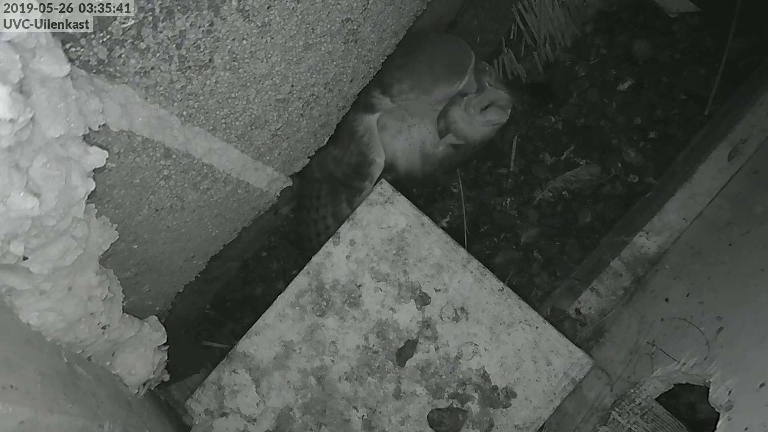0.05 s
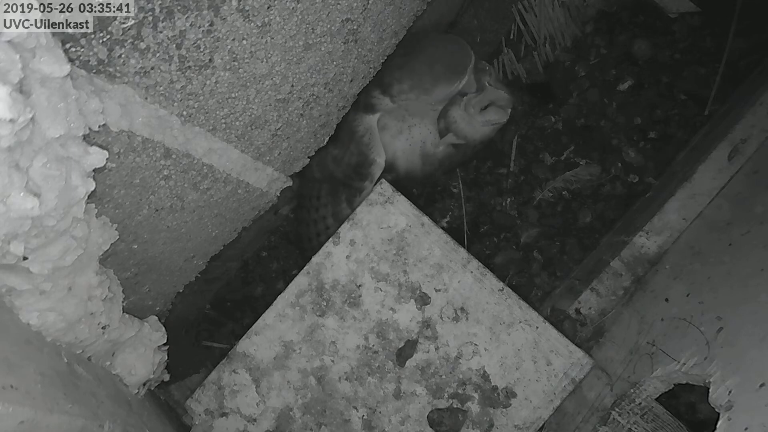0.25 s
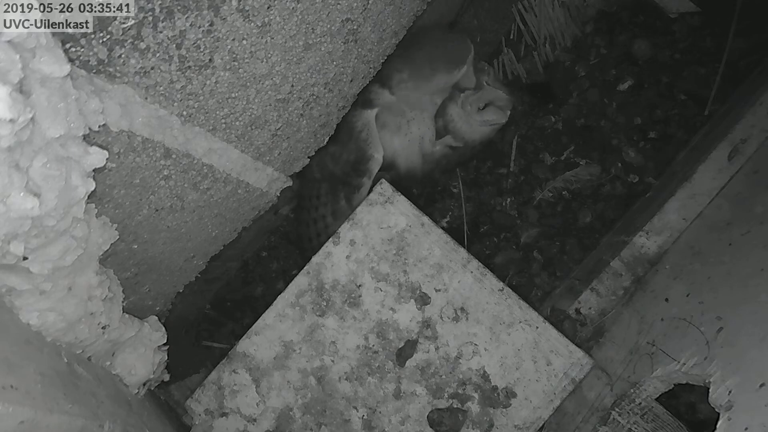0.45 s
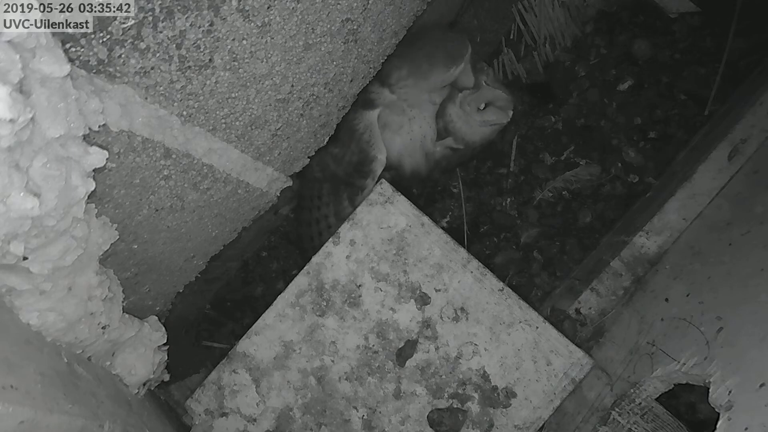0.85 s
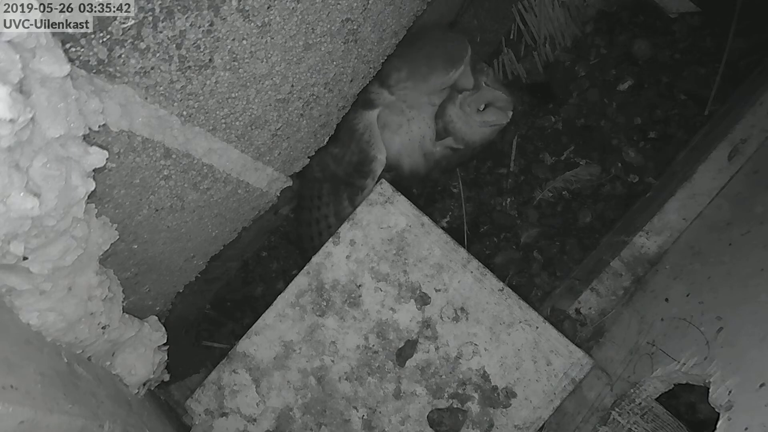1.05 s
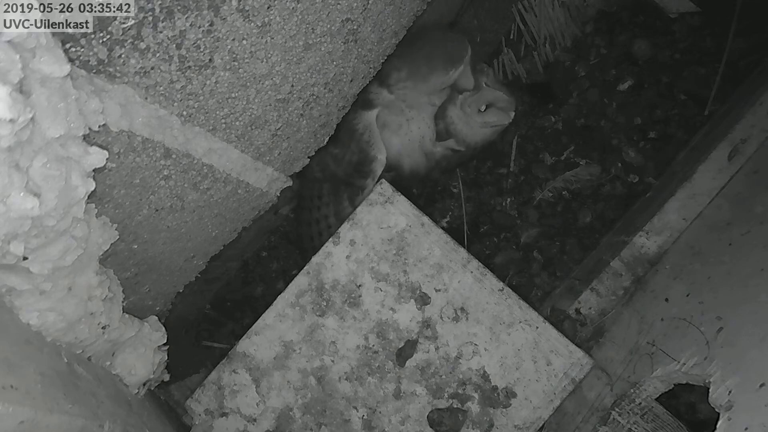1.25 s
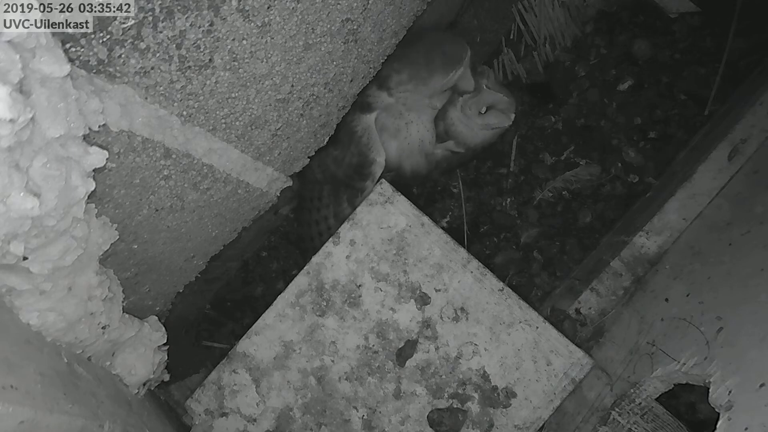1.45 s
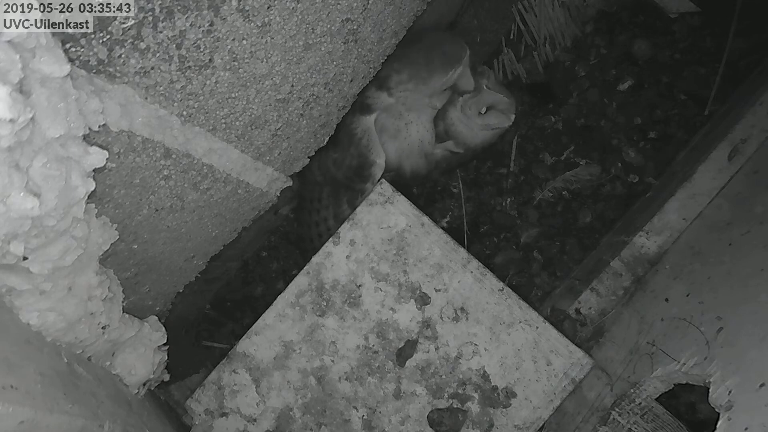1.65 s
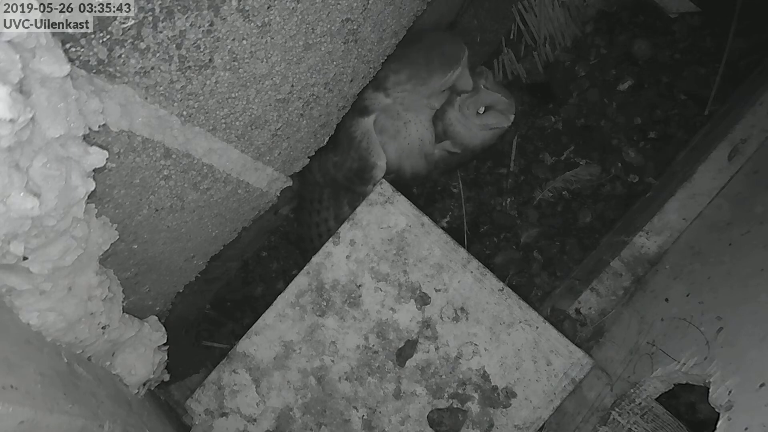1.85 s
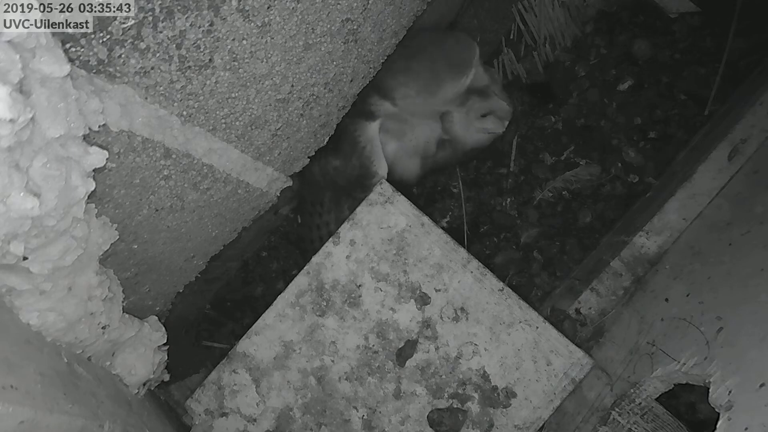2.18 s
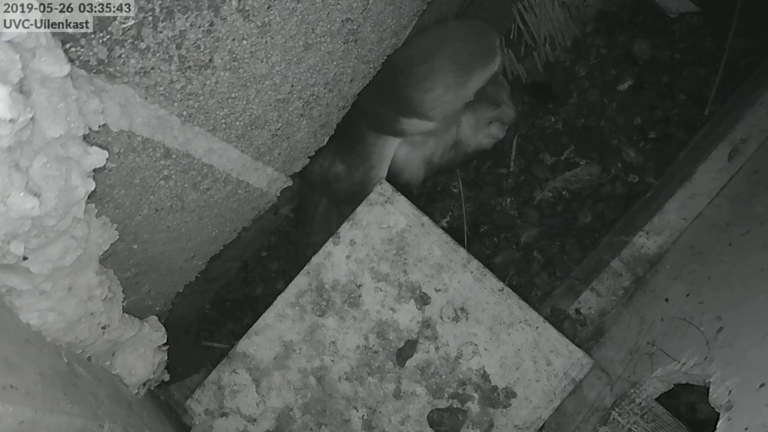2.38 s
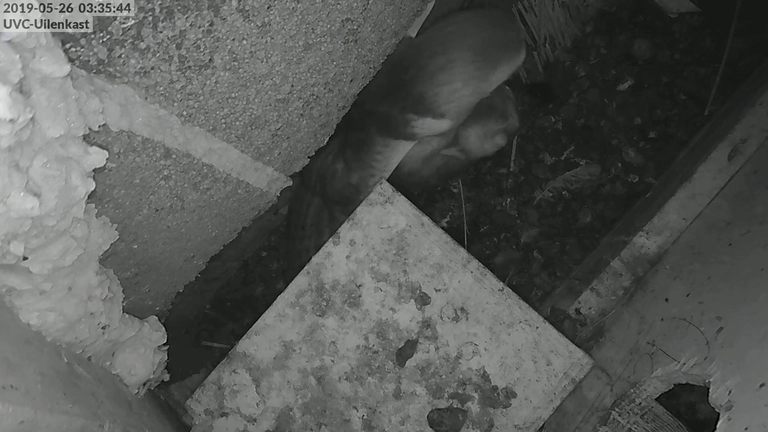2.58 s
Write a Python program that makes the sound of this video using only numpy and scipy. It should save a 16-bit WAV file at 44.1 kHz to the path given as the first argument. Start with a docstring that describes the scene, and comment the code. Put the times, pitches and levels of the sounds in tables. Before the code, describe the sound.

Harsh hisses from barn owls come four times in a row, growing louder, heard up close inside a nest box. Between them come thin whistles, soft clucks and a fast twitter, with two very faint foot bumps.

```python
"""Barn owls beg in a nest box with four long rasping hisses, close to a small microphone.
Each hiss follows the source-filter principle: air noise swells, flutters and is coloured by the
resonances of throat and box. Thin wavering whistles and a fast twitter, both harmonic tones mixed
with air, sound between the hisses, and soft clucks follow the second and the last.
Feet bump the floor twice, and the walls add a short reverberation."""
import sys
import numpy as np
from scipy import signal
from scipy.fft import rfft, irfft, next_fast_len
from scipy.io import wavfile
from scipy.ndimage import map_coordinates

SR = 44100
rng = np.random.default_rng(int(sys.argv[2]) if len(sys.argv) > 2 else 0)


def output_pcm(signal):
    """Save a mono or channel-first signal as 16-bit PCM at the path in sys.argv[1].

    Samples are clipped to [-1, 1] before scaling.
    """
    pcm = np.clip(np.atleast_2d(signal).T, -1, 1) * 32767
    wavfile.write(sys.argv[1], SR, np.round(pcm).astype(np.int16))


N = 121275
T = np.arange(N) / SR

# Spectra of the background and the floor board. Each row: frequency in Hz, gain in dB.
BACKGROUND_SPECTRUM = [(25, -2), (130, -27), (185, -4.5), (250, -11.5), (370, 2.5), (480, -10.5), (900, 2),
                       (2000, -14), (5000, -18), (9000, -11.5), (14000, -29)]
BOARD_SPECTRUM = [(40, -16), (140, -14), (195, 5), (260, -17), (380, -4), (700, -22), (3000, -60)]
# Footfalls. Each row: centre in seconds, half length in seconds, level in dB.
FOOT_BUMPS = [(1.376, .014, -68), (2.13, .025, -76)]

# Spectra of the air in the small calls. Each row: frequency in Hz, gain in dB.
CLUCK_BREATH = [(300, -31), (550, -12.5), (800, 1), (1300, -7), (1800, -10.5), (2300, -16), (2750, -5.5),
                (3200, -17), (3700, -16), (4500, -30), (6000, -22), (7800, -12.5), (9000, -25),
                (12000, -26), (15000, -42)]
TWITTER_BREATH = [(250, -35), (480, -19), (650, -2.5), (950, 2.5), (1250, -6), (1600, 5), (1950, -3.5),
                  (2350, -17), (2800, -10), (3200, -8), (3600, -42), (4200, -47), (5200, -26), (6500, -20),
                  (7900, -9.5), (9000, -31), (11300, -18), (12500, -38), (15000, -47)]
WHISTLE_BREATH = [(250, -41), (450, -16.5), (580, -1.5), (950, 2), (1380, -8), (1750, 0), (2050, 1),
                  (2400, -12.5), (2900, -11), (3400, 0.5), (3850, -38), (4300, -53), (5200, -28),
                  (6500, -12.5), (7900, -3), (9000, -17.5), (12500, -12.5), (15000, -52)]
# Partials of the voice. Each row: multiple of the pitch, relative level in dB.
HARMONICS = [(1, 0), (2, -13), (3, -33), (4, -28), (5, -26)]
# Partials of the low buzz. Each row: multiple of a third of the pitch, relative level in dB.
BUZZ_PARTIALS = [(1, -19), (2, -18), (4, -24), (5, -20), (6, -14)]
# Clucks. Each row: centre in seconds, half length in seconds, relative level in dB, pitch in Hz.
CLUCK_NOTES = [(1.045, 0.0053, -55, 1088), (1.071, 0.0042, -51, 1083), (1.088, .003, -57.5, 1232),
               (1.112, 0.0018, -56.5, 1413), (2.506, 0.0065, -54.5, 1080), (2.544, 0.0037, -59.5, 1050),
               (2.571, 0.007, -54.5, 1050), (2.598, 0.011, -49, 1310), (2.627, 0.0069, -52, 1310),
               (2.652, 0.0014, -66, 950), (2.66, 0.0061, -56.5, 1310), (2.681, 0.0065, -52.5, 1260),
               (2.707, 0.00086, -49.5, 900), (2.714, .0025, -55.5, 1150), (2.731, 0.0013, -61, 900),
               (2.743, 0.0032, -56, 1300)]
# Twitter. Each row: centre in seconds, relative level in dB.
TWITTER_NOTES = [(1.871, -46), (1.891, -45.5), (1.913, -46.5), (1.934, -44.5), (1.952, -46), (1.973, -46),
                 (1.994, -47.5), (2.013, -46)]
# One table per whistle. Each row: time in seconds, pitch in Hz, relative level in dB.
WHISTLE_CONTOURS = [
    [(.33, 1574, -54), (.352, 1572, -56), (.368, 1693, -44), (.41, 1746, -46), (.425, 1720, -55),
     (.44, 1715, -42.5), (.454, 1934, -55), (.468, 1770, -41), (.485, 1705, -46.5), (.495, 1865, -44.5),
     (.53, 1676, -44), (.542, 1880, -50), (.575, 1780, -42.5), (.614, 1720, -43.5), (.635, 1760, -64)],
    [(1.136, 1743, -66), (1.162, 1665, -48.5), (1.173, 1560, -44.5), (1.189, 1608, -52), (1.2, 1768, -43),
     (1.216, 1720, -52), (1.258, 1700, -45), (1.3, 1696, -47), (1.38, 1693, -44.5), (1.41, 1630, -73)],
]

# Bursts within the rasp. Each row: centre in seconds, half length in seconds, level in dB.
SPIT_BURSTS = [(0.058, 0.0023, -48), (0.278, 0.00074, -41), (0.725, 0.0022, -37), (1.477, .002, -40),
               (1.677, 0.0017, -59), (1.72, 0.0015, -49), (2.382, 0.001, -46), (2.452, 0.0018, -38)]
# One table per hiss. Each row: time in seconds, treble level in dB, relative throat band level in dB.
HISS_ENVELOPES = [
    [(0, -84, -53), (.016, -63, -68.5), (.028, -62, -60), (.14, -52, -57), (.22, -49.5, -55.5),
     (.3, -52.5, -58), (.35, -55.5, -53.5), (.4, -100, -66)],
    [(.533, -65, -59), (.552, -47.5, -55), (.63, -44, -52.5), (.73, -42.5, -51), (.9, -41, -50.5),
     (1.02, -44.5, -51), (1.045, -53.5, -54.5), (1.072, -72, -59), (1.086, -94, -66)],
    [(1.185, -55, -80), (1.21, -57.5, -53), (1.24, -46.5, -51.5), (1.45, -39, -48.5), (1.62, -37.5, -48.5),
     (1.72, -34.5, -49), (1.79, -38.5, -47), (1.856, -49, -46.5), (1.89, -79.5, -65)],
    [(2.02, -64, -49), (2.045, -44.5, -50.5), (2.1, -46.5, -48), (2.14, -40, -46.5), (2.25, -37.5, -47.5),
     (2.36, -35, -47), (2.47, -37, -48), (2.486, -53, -54.5), (2.515, -66, -67)],
]
# Flutter of each hiss. Each row: strongest crest in seconds, rate in Hz, depth in dB, spread in seconds.
HISS_FLUTTERS = [(0.135, 45.3, 3.5, 0.12), (0.718, 42.5, 1.5, 0.083), (1.72, 44.5, 4, 0.046),
                 (2.378, 38.4, 2, 0.059)]
# Resonances of throat and box, and the same in the last hiss, as the bird moves.
# Each row: frequency in Hz, gain in dB.
THROAT_SPECTRUM = [(150, -50), (400, -23.5), (520, -32), (680, -18), (850, -10.5), (1060, 3), (1270, -2.5),
                   (1380, -3.5), (1490, -7.5), (1730, -2), (2080, -12.5), (2310, -7), (2700, -18),
                   (3100, -5.5), (3400, -19.5), (3700, -8.5), (4000, -8), (4400, -15.5), (4590, -29),
                   (4780, -11), (5400, -13.5), (5780, -0.5), (6050, -6), (6280, -2), (6600, -16),
                   (6950, -9), (7200, 1.5), (7450, -9), (7720, 5), (7860, -5.5), (8060, 7.5), (8350, -7.5),
                   (8750, -16), (9300, -12), (10000, -14), (10700, -25), (11300, -18), (13600, -23.5),
                   (15000, -45)]
LAST_THROAT_SPECTRUM = [(150, -38), (400, -19), (520, -23.5), (700, -14), (1050, 0), (1400, -4.5),
                        (1530, -7), (1700, 1), (2050, -9), (2300, -7.5), (2500, -10), (2700, -23),
                        (2900, -10), (3100, -2), (3380, -15.5), (3750, -7), (4300, -8.5), (4600, -8),
                        (5100, -11), (5450, -13), (5880, 2), (6080, -13), (6300, 1.5), (6700, -9),
                        (7230, 3), (7450, -2.5), (7800, 5.5), (8300, -4), (8600, -2), (9300, -19),
                        (10050, -4), (10300, -20), (10600, -8.5), (11200, -17.5), (13500, -20.5),
                        (15000, -38)]
# Colour of the first three hisses. Each row: frequency in Hz, then gain in dB for each hiss.
HISS_TINTS = [(510, 1.5, 0.5, 1), (1060, -0.5, 2.8, -2.5), (1840, -4.5, -1.5, -3), (2420, 1, 3.5, -1),
              (3780, -1, 0.52, 0), (4740, -12.5, -2.4, -1), (6050, -0.5, -1.5, -3), (6700, 0, 2.6, 0),
              (7870, 6, -2, -4.5), (8700, 0.5, -0.062, -0.5), (10000, 5.5, 1.4, -2), (12100, -8, -2, -3.5)]
# A hollow and a peak that climb in the last hiss. Each row: time in seconds, hollow frequency in Hz,
# depth in dB, peak frequency in Hz, height over its surroundings in dB.
GAPE_GLIDE = [(2.03, 8950, 0, 7450, 0), (2.18, 9160, 12, 7680, 4), (2.33, 9400, 26, 7780, 9),
              (2.46, 9520, 20, 7800, 8), (2.49, 9520, 0, 7800, 0)]


def amp(db):
    """Decibels to gain."""
    return 10 ** (np.asarray(db) / 20)


def unit(x):
    """Normalisation to rms 1."""
    return x / np.sqrt(np.mean(x ** 2) + 1e-20)


def colour(points, hz):
    """Gain interpolated between (Hz, dB) points on a log frequency axis."""
    f, db = np.transpose(points)
    return amp(np.interp(np.log(hz + 1), np.log(f + 1), db))


def filtered(x, response):
    """Linear filtering: the spectrum times a frequency response."""
    size = next_fast_len(N + 8192)
    return irfft(rfft(x, size) * response(np.fft.rfftfreq(size, 1 / SR)), size)[:N]


def noise(points):
    """Spectrally shaped noise of rms 1."""
    return unit(filtered(rng.standard_normal(N), lambda hz: colour(points, hz)))


def wobble(rate):
    """A smooth random modulator, rate knots a second."""
    return map_coordinates(rng.standard_normal(4096), [T * rate], mode="wrap")


def bell(x, centre, width):
    """A Gaussian of height 1."""
    return np.exp(-((x - centre) / width) ** 2)


def level(times, db):
    """An amplitude envelope, silent outside its points."""
    return amp(np.interp(T, times, db, left=-140, right=-140))


def pulses(rows):
    """An envelope of Gaussian pulses."""
    return sum(amp(db) * bell(T, centre, half_length) for centre, half_length, db, *_ in rows)


def background():
    """Stationary noise lies faintly under the calls."""
    return amp(-69) * noise(BACKGROUND_SPECTRUM)


def box_reverberation(x, t60_s=.05):
    """Wall reflections: convolution with an exponentially decaying impulse response."""
    t = T[:SR // 4]
    tail = rng.standard_normal(len(t)) * amp(-60 * t / t60_s) * (t > .002)
    return signal.fftconvolve(x, tail / np.linalg.norm(tail))[:N]


def feet():
    """Impacts excite the low resonances of the floor board."""
    return noise(BOARD_SPECTRUM) * pulses(FOOT_BUMPS)


def voice(pitch, waver, buzz=0):
    """A harmonic series with pitch jitter; optional subharmonics add a low buzz."""
    phase = 2 * np.pi * np.cumsum(pitch * (1 + waver * wobble(328.8))) / SR
    # phase noise smears the higher overtones more
    tone = sum(amp(db) * np.sin(k * phase + (k - 1) * .23 * wobble(560)) for k, db in HARMONICS)
    low_buzz = sum(amp(db) * np.sin(k * phase / 3) for k, db in BUZZ_PARTIALS)
    return unit(tone + buzz * low_buzz)


def clucks():
    """Short pulses gate a low-passed tone and air noise in nearly equal parts."""
    times, _, _, pitches = np.transpose(CLUCK_NOTES)
    tone = voice(np.interp(T, times, pitches), waver=.05)
    soft_tone = filtered(tone, lambda hz: bell(hz, 0, 5000))
    return pulses(CLUCK_NOTES) * (amp(-2.5) * noise(CLUCK_BREATH) + amp(-1.5) * soft_tone)


def twitter(top_hz=1950, dip_hz=380, half_note_s=.0065):
    """Frequency modulation: the pitch dips in each quick note, and jitter makes it hoarse."""
    pitch = top_hz - dip_hz * sum(bell(T, s, half_note_s) for s, _ in TWITTER_NOTES)
    envelope = pulses((s, half_note_s, db) for s, db in TWITTER_NOTES)
    return envelope * (amp(-3) * voice(pitch, waver=.08) + amp(-1) * noise(TWITTER_BREATH))


def whistles(clear_at_s=.074, pulse_hz=39, pulse_depth_db=10):
    """Growing jitter and amplitude modulation roughen two clear tones and break them into pulses."""
    out = np.zeros(N)
    for contour in WHISTLE_CONTOURS:
        times, hz, db = np.transpose(contour)
        age = T - times[0]
        rough_s = np.clip(age - clear_at_s, 0, .5)
        beat = np.cos(2 * np.pi * (pulse_hz * age + .21 * wobble(20)))
        breaks = np.minimum(rough_s / .14, 1) * (1 - beat) / 2
        pitch = np.interp(T, times, hz) * (1 + .0403 * breaks)
        tone = voice(pitch, waver=.007 + .194 * rough_s, buzz=bell(age, clear_at_s, .03))
        pulsed_tone = amp(-pulse_depth_db * breaks) * tone
        out += level(times, db) * (pulsed_tone + amp(-8) * noise(WHISTLE_BREATH))
    return filtered(out, lambda hz: amp(-31 * bell(hz, 4110, 494)))  # a notch in their colour


def gape(x, hollow_width_hz=260, peak_width_hz=170):
    """A time-varying filter: a steep-sided hollow and a peak glide upward during the last hiss."""
    hz, t, spectra = signal.stft(x, SR, nperseg=512)
    times, *columns = np.transpose(GAPE_GLIDE)
    hollow_hz, hollow_db, peak_hz, peak_db = [np.interp(t, times, c) for c in columns]
    hollow = np.exp(-((hz[:, None] - hollow_hz) / hollow_width_hz) ** 4)
    peak = bell(hz[:, None], peak_hz, peak_width_hz) - .35  # the rest sinks as the peak grows
    gain = amp(peak_db * peak - hollow_db * hollow)
    return signal.istft(spectra * gain, SR, nperseg=512)[1][:N]


def spits():
    """Transients: the hardest beats of the rasp are air bursts filtered by the throat."""
    bursts = rng.standard_normal(N) * pulses(SPIT_BURSTS)
    return filtered(bursts, lambda hz: unit(colour(THROAT_SPECTRUM, hz)))


def hiss(envelope, flutter, resonances, crossover_hz=2330):
    """Source and filter: amplitude-modulated air noise passes the throat's resonances in two bands."""
    times, treble_db, throat_db = np.transpose(envelope)
    crest_s, rate_hz, depth_db, spread_s = flutter
    beat = np.cos(2 * np.pi * ((T - crest_s) * rate_hz + .03 * wobble(22)))
    flutter_db = depth_db * np.sqrt(bell(T, crest_s, spread_s)) * beat
    rough_db = flutter_db + wobble(329.2) + .75 * wobble(61.1)  # fast rasp, slower shake
    treble_air = rng.standard_normal(N) * amp(rough_db)
    throat_air = rng.standard_normal(N) * amp(.26 * rough_db)
    low_share = lambda hz: 1 / (1 + (hz / crossover_hz) ** 6)
    treble = unit(filtered(treble_air, lambda hz: resonances(hz) * np.sqrt(1 - low_share(hz))))
    throat = unit(filtered(throat_air, lambda hz: resonances(hz) * np.sqrt(low_share(hz))))
    return treble * level(times, treble_db) + throat * level(times, throat_db + 2)


def hisses():
    """Four begging hisses, each with the timbre of its own frequency response."""
    hz, *tints = np.transpose(HISS_TINTS)
    responses = [lambda f, tint=tint: colour(THROAT_SPECTRUM, f) * colour(np.c_[hz, tint], f)
                 for tint in tints]
    responses.append(lambda f: colour(LAST_THROAT_SPECTRUM, f))
    return sum(hiss(*call) for call in zip(HISS_ENVELOPES, HISS_FLUTTERS, responses))


def scene():
    """Superposition of the calls, their reflections, the feet and the background."""
    owls = hisses() + spits() + whistles() + twitter() + clucks()
    owls_in_box = owls + amp(-17) * box_reverberation(owls)
    return (gape(owls_in_box) + feet() + background())[None]


def record(dry):
    """Band limiting: the microphone passes nothing above 15150 Hz."""
    return filtered(dry[0], lambda hz: hz < 15150)[None]


dry = scene()
out = record(dry)
output_pcm(out)
```